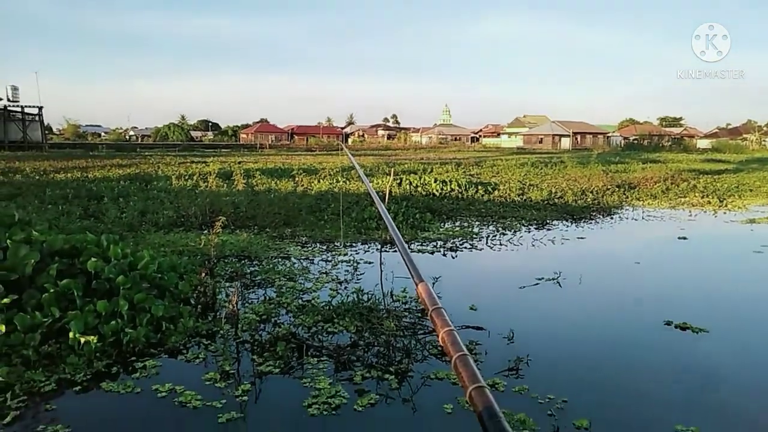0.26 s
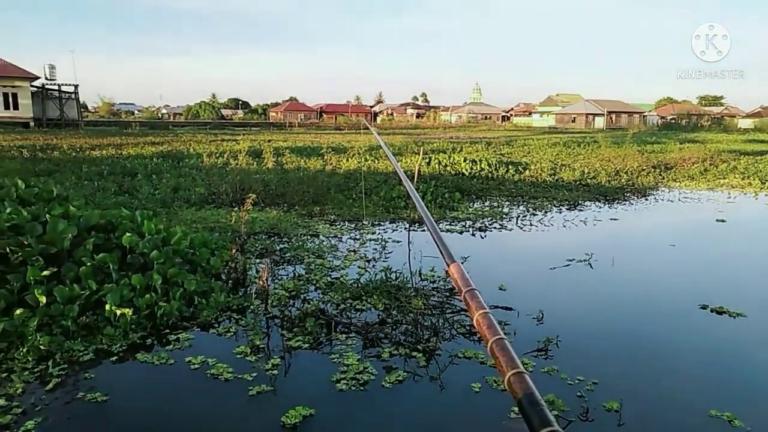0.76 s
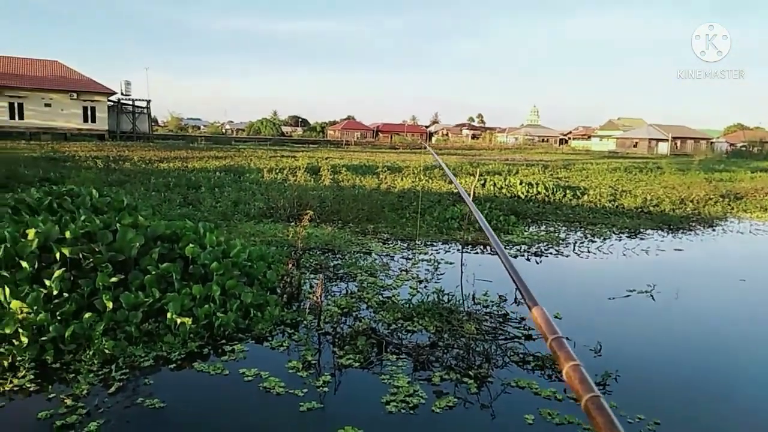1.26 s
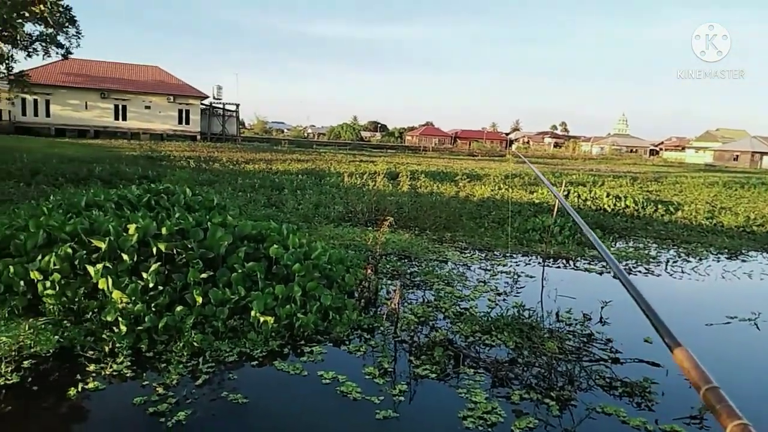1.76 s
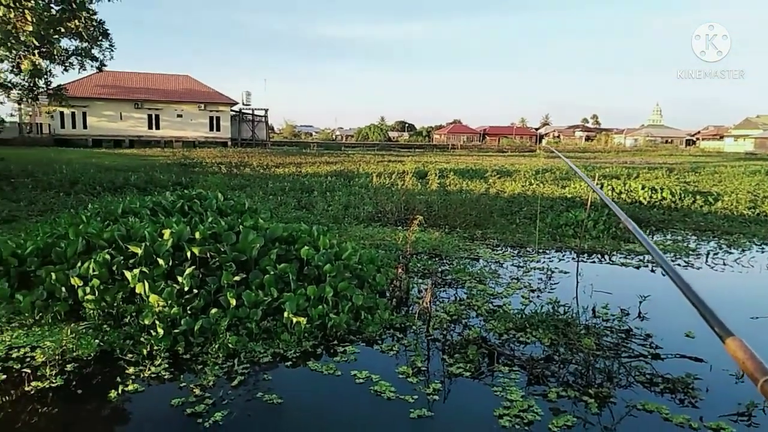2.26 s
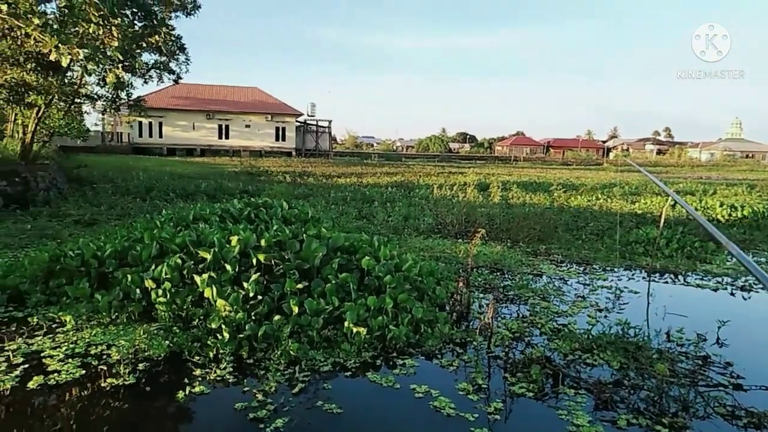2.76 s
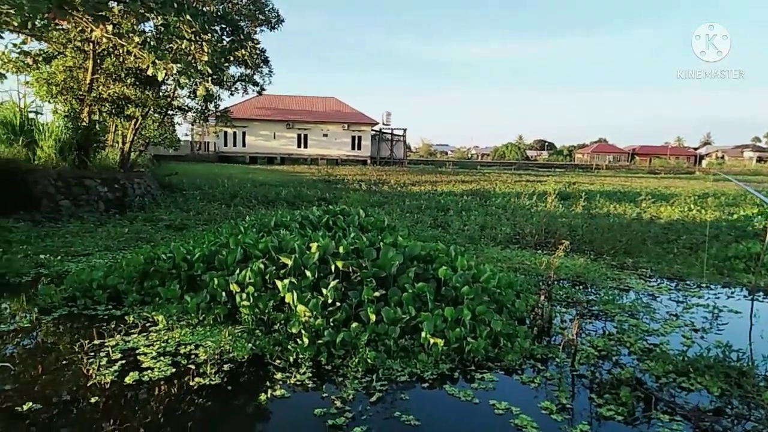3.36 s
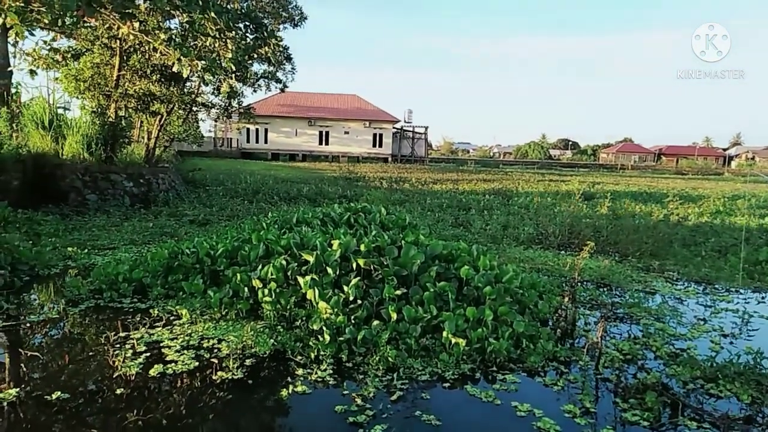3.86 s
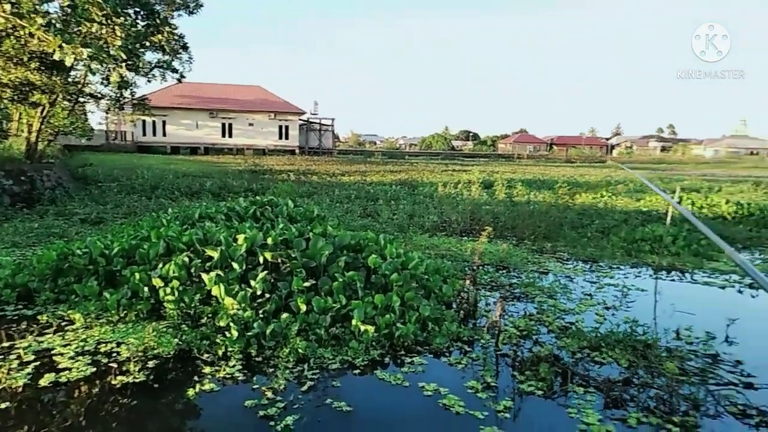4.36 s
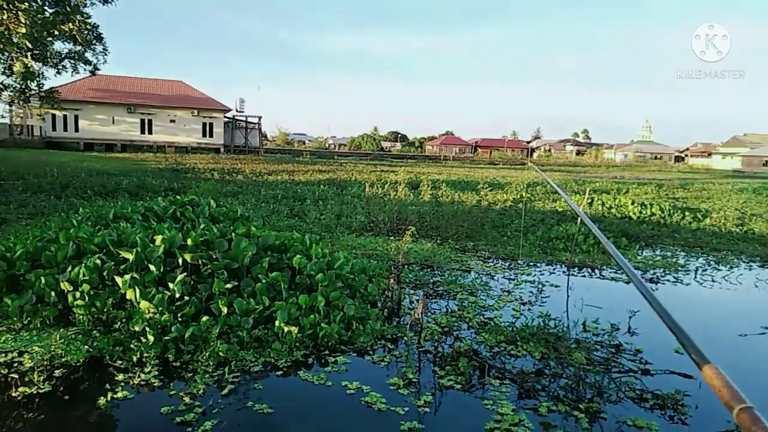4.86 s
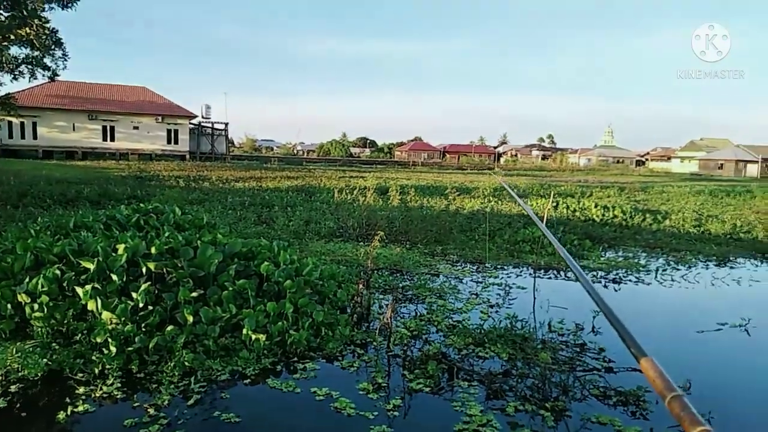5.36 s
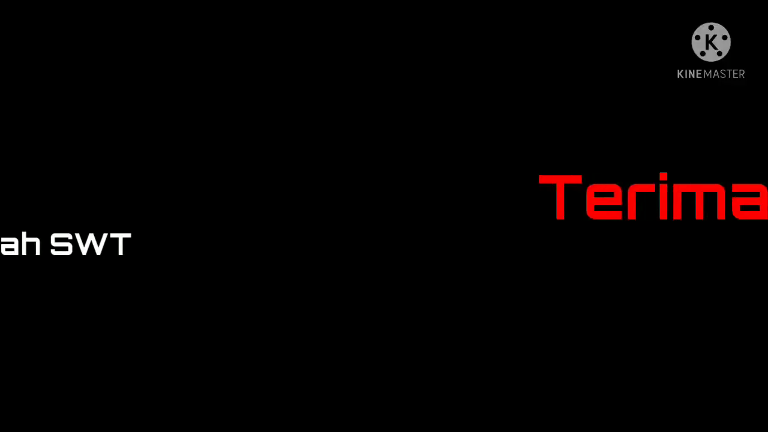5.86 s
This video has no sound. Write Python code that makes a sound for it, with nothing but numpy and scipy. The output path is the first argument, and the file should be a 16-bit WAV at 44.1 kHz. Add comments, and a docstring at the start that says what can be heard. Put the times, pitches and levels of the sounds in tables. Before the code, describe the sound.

Beside a marsh, a small engine growls and recedes to a drone before a motorcycle passes, with faint fishing rod taps and bird chirps.

```python
"""A road beside a marsh. A small four-cylinder engine pulls away: gas pulses ring its muffler and
tailpipe, growling under throttle, then thinning to a drone. A motorcycle putters up and passes with
a rush, a bright fizz and swells of road noise. Nearby a fishing rod is tapped and rubbed. There are
light clicks and brief scuffs, and a bird chirps faintly over distant traffic; all stops abruptly."""
import sys
import numpy as np
from scipy import signal
from scipy.fft import rfft, irfft, next_fast_len
from scipy.io import wavfile
from scipy.ndimage import map_coordinates

SR = 44100
rng = np.random.default_rng(int(sys.argv[2]) if len(sys.argv) > 2 else 0)


def inscribe(sig):
    """Save sig as 16-bit PCM at rate SR to the path in sys.argv[1].

    A 1-D sig is mono; a 2-D sig holds one channel per row.
    Samples are clipped to [-1, 1] before scaling.
    """
    pcm = np.round(np.clip(np.atleast_2d(sig).T, -1, 1) * 32767)
    wavfile.write(sys.argv[1], SR, pcm.astype(np.int16))


N = 269451
TIME_S = np.arange(N) / SR


def amp(db):
    """Decibels to gain."""
    return 10 ** (np.asarray(db) / 20)


def unit(x):
    """Scale to rms 1."""
    return x / np.sqrt(np.mean(x ** 2) + 1e-20)


def curve(rows):
    """(t/s, value) rows to one value per sample."""
    return np.interp(TIME_S, *np.transpose(rows))


def ramp(start_s, length_s):
    """Linear rise from 0 to 1."""
    return np.clip((TIME_S - start_s) / length_s, 0, 1)


def swell(centre_s, length_s):
    """Gaussian envelope, peak 1."""
    return np.exp(-2 * ((TIME_S - centre_s) / length_s) ** 2)


def wobble(rate_hz):
    """Smooth random curve, knots at rate_hz."""
    return map_coordinates(rng.standard_normal(int(N * rate_hz / SR) + 4), [TIME_S * rate_hz])


def filtered(x, response):
    """Apply a complex frequency response."""
    size = next_fast_len(N + SR // 2)
    return irfft(rfft(x, size) * response(np.fft.rfftfreq(size, 1 / SR)), size)[:N]


def noise(spectrum):
    """Noise of rms 1, shaped by (f/Hz, density/dB) rows."""
    hz, db = np.transpose(spectrum)
    colour = lambda f: amp(np.interp(np.log(f + 1), np.log(hz), db)) * (f > hz[0] / 2)
    return unit(filtered(rng.standard_normal(N), colour))


def resonate(x, modes):
    """Parallel resonances, each two like band-passes in series; output rms 1."""
    band = lambda f, hz, width: 1j * f * width / (hz * hz - f * f + 1j * f * width)
    return unit(filtered(x, lambda f: sum(amp(db) * band(f, hz, width) ** 2 for hz, width, db in modes)))


def firings(cycle, scatter_db, jitter_s):
    """One gas pulse per firing, scattered in size and timing."""
    starts = np.flatnonzero(np.diff(np.floor(cycle), prepend=-1) > 0)
    size, delay = rng.standard_normal((len(starts), 2)).T
    at = np.clip(starts + np.round(delay * jitter_s * SR), 0, N - 1).astype(int)
    return np.bincount(at, amp(scatter_db * size), N)


def puffs(cycle, depth_db):
    """Gain that jumps at each firing and sinks until the next."""
    return unit(amp(-depth_db * (cycle % 1)))


# Engine speed: t/s, firing rate/Hz
FIRING_RATE = [(0, 61.2), (.3, 61), (.7, 63.3), (1.1, 64.8), (1.5, 67.1), (1.9, 68.7), (2.9, 71.4),
               (3.6, 73.1), (5.45, 75)]
# Cylinder imbalance in firing order: strength offset (-1 to 1)
CYLINDER_IMBALANCE = [-0.38, 0.0078, -0.14, -0.34]
def leaving_engine():
    """Four unequal cylinders gain speed and recede; the low tailpipe modes carry farthest."""
    rate_hz = curve(FIRING_RATE)
    cycle = np.cumsum(rate_hz) / SR
    opening, growl_db, whistle_db = throttle()
    imbalance = np.take(CYLINDER_IMBALANCE, np.round(cycle).astype(int), mode="wrap")
    pulses = firings(cycle, scatter_db=1.3, jitter_s=.00005)
    lope = muffler_lope(pulses, imbalance, opening)
    blast = gas_blast(pulses, imbalance, cycle, rate_hz)
    low_growl, high_growl = tailpipe_growl(blast, growl_db, opening, rate_hz)
    hiss, whistle = escaping_gas(cycle, growl_db, whistle_db)
    receding_s = np.maximum(TIME_S - .95, 0)
    slow_fade, fast_fade = amp(-.5 * receding_s), amp(-7 * receding_s)
    return drone(cycle) + whistle + slow_fade * low_growl + fast_fade * (lope + high_growl + hiss)


# Throttle bursts: t/s, attack/s, hold/s, release/s, growl drive/dB, whistle level/dB
THROTTLE_BURSTS = [(-.2, 0.086, .15, 0.16, -21.5, -47), (0.576, .135, 1.087, 0.6, -23.5, -54)]
def throttle(shut_growl_db=-38, shut_whistle_db=-73, bite_db=4.5, bite_s=.012, whistle_lag_s=.05):
    """Opening (0-1), growl drive and whistle level; the whistle waits for gas pressure to follow."""
    opening, growl_db, whistle_db = 0, shut_growl_db, shut_whistle_db
    for s, attack, hold, release, open_growl_db, open_whistle_db in THROTTLE_BURSTS:
        gate = lambda lag: ramp(s + lag, attack) - ramp(s + lag + attack + hold, release)
        overshoot = np.exp(-((TIME_S - s - attack) / bite_s) ** 2)
        opening += gate(0)
        growl_db += gate(0) * (open_growl_db - shut_growl_db) + bite_db * overshoot
        whistle_db += gate(whistle_lag_s) * (open_whistle_db - shut_whistle_db)
    return opening, growl_db, whistle_db


# Drone swells along the road: t/s, level/dB
DRONE_SWELLS = [(0, -15.5), (0.08, -18.5), (0.2, -28.5), (0.48, -19), (0.56, -22.5), (0.75, -17.5),
                (1.77, -18), (2.01, -26.5), (2.13, -18.5), (2.53, -21), (2.72, -33), (2.8, -19.5),
                (3.05, -24), (3.44, -33.5), (4.15, -26.5), (4.65, -36), (5.1, -46), (5.44, -43)]
# Exhaust orders 1-4: near gain/dB, far gain/dB, share of swell and wander
EXHAUST_ORDERS = [(-8, -13.5, .5), (-2.2, 0.5, 1.05), (-0.93, -12.5, 1.1), (-10.5, -40, 0.54)]
def drone(cycle, loaded_db=-17, wander_db=2):
    """The lowest exhaust orders swell together; with distance only the second stays strong."""
    swell_db = curve(DRONE_SWELLS) - loaded_db
    away = ramp(start_s=1.57, length_s=1.4)
    total = 0
    for k, (near_db, far_db, share) in enumerate(EXHAUST_ORDERS, 1):
        steady_db = loaded_db + near_db + away * (far_db - near_db)
        moving_db = share * (swell_db + wander_db * wobble(12))
        muffler_lag_rad = np.pi / 7 * (k - 1) ** 2  # rounds off each beat
        tone = -np.sqrt(2) * np.cos(2 * np.pi * k * cycle - muffler_lag_rad)
        total += amp(steady_db + moving_db) * tone
    return total * amp(.8 * wobble(30))


# Muffler resonances: f/Hz, width/Hz, gain/dB
MUFFLER_MODES = [(148.3, 48, -4), (166.7, 38.4, 14.5), (204, 26.3, 14.5), (287, 18, -29.5)]
def muffler_lope(pulses, imbalance, opening, open_db=-20.5, shut_db=-25.5):
    """Unequal strokes ring the muffler between the orders."""
    unevenness = imbalance - np.mean(CYLINDER_IMBALANCE) + .5 * wobble(60)
    return amp(shut_db + opening * (open_db - shut_db)) * resonate(pulses * unevenness, MUFFLER_MODES)


def gas_blast(pulses, imbalance, cycle, rate_hz, base_rasp=.35, rasp_per_hz=.07):
    """Each pulse drags turbulent gas along, more as the revs climb."""
    turbulence = puffs(cycle, depth_db=13) * rng.standard_normal(N)
    rasp = base_rasp + rasp_per_hz * (rate_hz - rate_hz.min())
    stroke_gain = amp(4 * imbalance + wobble(25))
    return stroke_gain * (unit(pulses) + rasp * turbulence) / np.hypot(1, rasp)


# Tailpipe resonances, two low then two high: f/Hz, width/Hz, gain/dB
TAILPIPE_MODES = [(352, 14, -6), (399.6, 140, -4), (520.7, 69, 0), (551, 61, -7.5)]
# Blare resonances above them: f/Hz, width/Hz, gain/dB
BLARE_MODES = [(737, 51, 1.5), (849, 140, 0.5), (1009, 123, -6)]
def tailpipe_growl(blast, drive_db, opening, rate_hz, full_blare_hz=63.3, loss_db_per_hz=2.5):
    """The blast rings the pipe; low revs or a slack throttle blunt the pulses and cut the blare."""
    low = amp(drive_db - 9) * resonate(blast, TAILPIPE_MODES[:2])
    high = amp(drive_db - 2.5) * resonate(blast, TAILPIPE_MODES[2:])
    blunt_db = 5.2 * (1 - opening) + loss_db_per_hz * np.maximum(full_blare_hz - rate_hz, 0)
    blare = amp(drive_db - 5.5 - blunt_db) * resonate(blast, BLARE_MODES)
    return low, high + blare


# Outlet hiss: f/Hz, density/dB
HISS_SPECTRUM = [(700, 10), (1100, 6.5), (1600, -3.5), (2100, 0), (3200, -26), (4500, -23.5), (6000, -29),
                 (12000, -52.5)]
# Gap whistle: f/Hz, density/dB
WHISTLE_SPECTRUM = [(5000, -39), (6100, -13), (6700, 7), (7500, 9), (8200, -8), (9500, -44), (15000, -40.5)]
def escaping_gas(cycle, drive_db, whistle_db):
    """Pulsing gas hisses at the outlet and whistles through a narrow gap."""
    hiss = amp(drive_db - 10) * puffs(cycle, depth_db=1.5) * noise(HISS_SPECTRUM)
    whistle = amp(whistle_db) * puffs(cycle, depth_db=3.5) * noise(WHISTLE_SPECTRUM)
    return hiss, whistle


def passing_motorcycle(closest_s=4.72, distance_over_speed_s=.42, firing_hz=42.6, doppler=.045):
    """A slow single cylinder goes by, its pitch sinking."""
    position = (TIME_S - closest_s) / distance_over_speed_s  # in closest distances
    distance = np.hypot(1, position)
    ahead = -position / distance
    spread_db = -20 * np.log10(distance)
    cycle = np.cumsum(firing_hz * (1 + doppler * ahead)) / SR
    exhaust = motorcycle_exhaust(cycle, spread_db, ahead)
    return exhaust + motorcycle_rush(cycle, spread_db) + motorcycle_fizz(spread_db, ahead)


# Silencer resonances: f/Hz, width/Hz, gain/dB
SILENCER_MODES = [(85, 25, -9), (125.4, 38, 11), (172.1, 45.5, 15.5), (245, 170, -22), (410, 240, -15.5),
                  (896, 400, -18.5)]
def motorcycle_exhaust(cycle, spread_db, ahead, closest_db=-35):
    """Pulses ring the silencer; the deepest orders peak as the pipe faces the listener."""
    pulses = firings(cycle, scatter_db=4.5, jitter_s=.0003)
    putter = amp(closest_db + .083 * spread_db + 2.5 * ahead) * resonate(pulses, SILENCER_MODES)
    facing = np.exp(-((TIME_S - 4.85) / .83) ** 2)
    throb = amp(-38.5) * np.cos(2 * np.pi * cycle) + amp(-34) * np.cos(4 * np.pi * cycle)
    return putter + facing * throb


# Passing rush, with a 7.6 kHz microphone peak: f/Hz, density/dB
RUSH_SPECTRUM = [(250, -10), (330, -9.5), (430, -11), (620, -3), (800, 1.5), (1100, -2), (1800, 1),
                 (2600, -5.5), (3500, -12), (4600, -20.5), (6000, -24), (7650, -15), (9500, -34)]
def motorcycle_rush(cycle, spread_db, closest_db=-31, road_db=-43):
    """Broad noise swells out of the steady rush of the road as the motorcycle passes."""
    gain = np.hypot(amp(closest_db + 1.276 * spread_db), amp(road_db))
    flutter = amp(.93 * wobble(45) + .27 * wobble(8))
    return gain * flutter * puffs(cycle, depth_db=1.5) * noise(RUSH_SPECTRUM)


# Bright fizz, with a 7.6 kHz microphone peak; also tops the rod scrapes: f/Hz, density/dB
FIZZ_SPECTRUM = [(3000, -40), (5000, -8), (6300, 2), (7600, 8.5), (8600, 4.5), (10500, -2.5), (12500, -7.5),
                 (14000, 0), (15500, 6)]
def motorcycle_fizz(spread_db, ahead, closest_db=-45.5):
    """Bright, flickering noise, louder on approach."""
    flicker_db = .6 * wobble(220) + .684 * wobble(18)
    return amp(closest_db + .98 * spread_db + 3.5 * ahead + flicker_db) * noise(FIZZ_SPECTRUM)


# Brief scuffs and longer road swells: t/s, length/s, f/Hz, width/Hz, level/dB
SCUFFS_AND_SWELLS = [(0.745, 0.034, 1280, 900, -39), (2.036, 0.35, 1460, 870, -40),
                     (2.994, 0.025, 1150, 50, -41.5), (3.189, 0.14, 1450, 1210, -39.5),
                     (3.336, 0.038, 1940, 896, -34.5), (3.976, 0.447, 434, 87.5, -40.5),
                     (4.082, 0.032, 1100, 2000, -33.5), (4.42, .2, 472, 159.5, -34),
                     (4.49, 0.1713, 1600, 654.4, -30), (4.814, 0.16, 2020, 1300, -34.5),
                     (4.95, 0.74, 3430, 493, -51), (5.203, 0.36, 1810, 355, -38)]
def scuffs_and_road_swells():
    """Brief scuffs, and longer swells of road noise from the passing motorcycle; one band each."""
    total = 0
    for s, length, hz, width, db in SCUFFS_AND_SWELLS:
        band = filtered(rng.standard_normal(N), lambda f: 1 / (1 + (2 * (f - hz) / width) ** 2))
        total += amp(db) * swell(s, length) * unit(band)
    return total


# Taps on the rod: t/s, relative level/dB
ROD_TAPS = [(2.272, -34), (2.281, -27.5), (2.323, -31), (2.364, -30), (2.376, -32)]
# Rod modes: f/Hz, gain/dB, t60/s
ROD_MODES = [(1347, -3, 0.049), (1426, -5, 0.038), (1490, -15, 0.021)]
def rod_knocks(gain_db=4, attack_s=.0012):
    """Each tap briefly rings the hollow rod."""
    t = TIME_S[:SR // 10]
    ring = sum(amp(db - 60 * t / t60) * np.sin(2 * np.pi * hz * t) for hz, db, t60 in ROD_MODES)
    ring *= 1 - np.exp(-t / attack_s)
    tap_s, tap_db = np.transpose(ROD_TAPS)
    taps = np.bincount(np.round(tap_s * SR).astype(int), amp(tap_db + gain_db), N)
    return signal.fftconvolve(taps, ring)[:N]


# Light clicks: t/s, level/dB, t60/s
CLICK_EVENTS = [(.692, -46, 0.119), (4.883, -28, .025), (4.888, -39.5, 0.093)]
# Click noise: f/Hz, density/dB
CLICK_SPECTRUM = [(3000, -32), (6000, 5.5), (7600, 12.5), (10000, -5), (13000, -9), (15500, -12)]
def clicks(attack_s=.002):
    """Bright ticks with a short noisy tail."""
    envelope = sum(ramp(s, attack_s) * amp(db - 60 * np.abs(TIME_S - s) / t60)
                   for s, db, t60 in CLICK_EVENTS)
    return envelope * noise(CLICK_SPECTRUM)


# Hand strokes: t/s, length/s, level of the top/dB
HAND_STROKES = [(3.138, .03, -51.5), (3.206, .25, -50.5), (3.348, .04, -51.5), (4.082, .05, -44.5),
                (4.36, .1, -45)]
# Broad rub resonance: f/Hz, width/Hz, gain/dB
RUB_MODES = [(3260, 3400, 0)]
def rod_scrapes():
    """A hand rubs the rod: grainy friction with a dry body and a bright top."""
    strokes = sum(amp(db) * swell(s, length) for s, length, db in HAND_STROKES)
    body = amp(-3) * resonate(rng.standard_normal(N), RUB_MODES)
    grain = amp(1.5 * wobble(220))
    return strokes * grain * (noise(FIZZ_SPECTRUM) + body)


# Chirps: t/s, length/s, f/Hz, level/dB
BIRD_CHIRPS = [(0.022, 0.047, 3250, -49.5), (0.862, 0.041, 4050, -54.5), (1.088, 0.041, 2310, -39)]
def bird(relative_rise_per_s=1.9):
    """Short, slightly unsteady rising whistles."""
    total = 0
    for s, length, hz, db in BIRD_CHIRPS:
        pitch_hz = hz * (1 + relative_rise_per_s * (TIME_S - s) + .05 * wobble(600))
        total += amp(db) * swell(s, length) * np.sin(2 * np.pi * np.cumsum(pitch_hz) / SR)
    return total


# Traffic rumble: f/Hz, density/dB
TRAFFIC_SPECTRUM = [(20, -13), (50, -6), (150, 2.5), (300, -10), (600, -16), (1500, -23), (6000, -62)]
def distant_traffic(level_db=-32.5):
    """Steady low rumble of far vehicles."""
    return amp(level_db) * noise(TRAFFIC_SPECTRUM)


def scene():
    """Both vehicles and the small sounds over far traffic; open air, mono."""
    vehicles = leaving_engine() + passing_motorcycle()
    details = scuffs_and_road_swells() + rod_knocks() + clicks() + rod_scrapes()
    return (vehicles + details + bird() + distant_traffic())[None]


def record(dry, end_s=5.461, fade_s=.004, cutoff_hz=15550):
    """Abrupt start and stop, then a steep low-pass."""
    edge_s = np.minimum(TIME_S, end_s - TIME_S)
    gate = np.sin(np.pi / 2 * np.clip(edge_s / fade_s, 0, 1)) ** 2
    return filtered(dry[0] * gate, lambda f: (1 - np.tanh((f - cutoff_hz) / 30)) / 2)[None]


dry = scene()
out = record(dry)
inscribe(out)
```